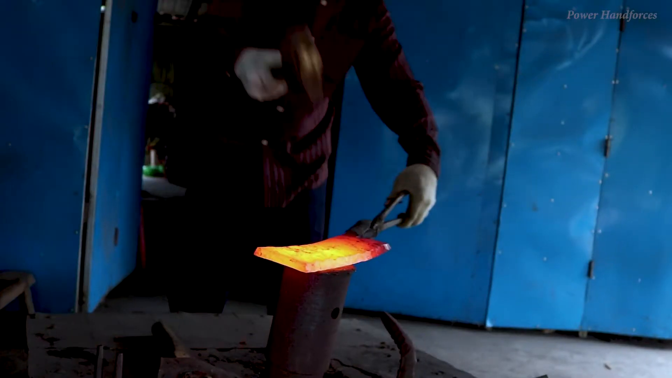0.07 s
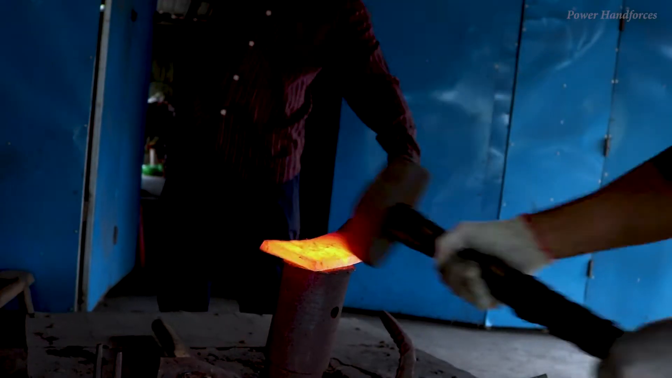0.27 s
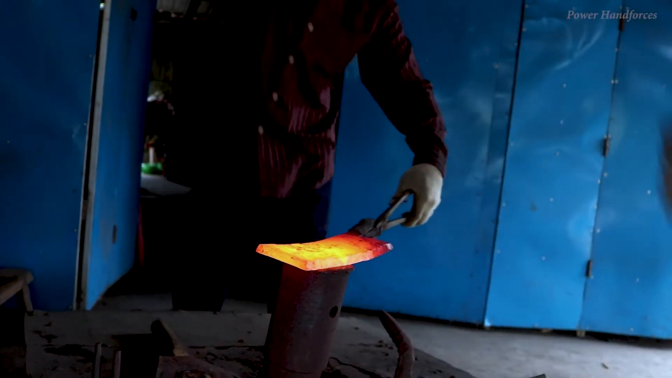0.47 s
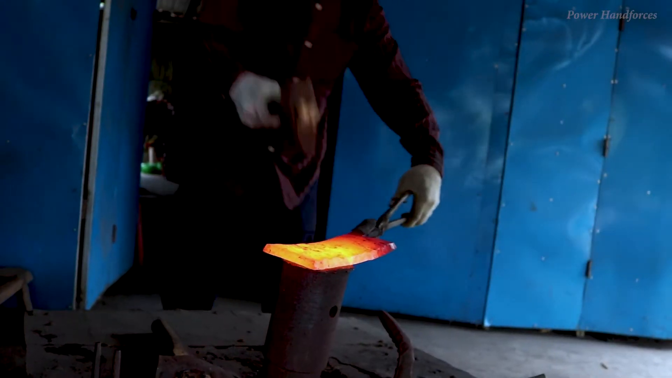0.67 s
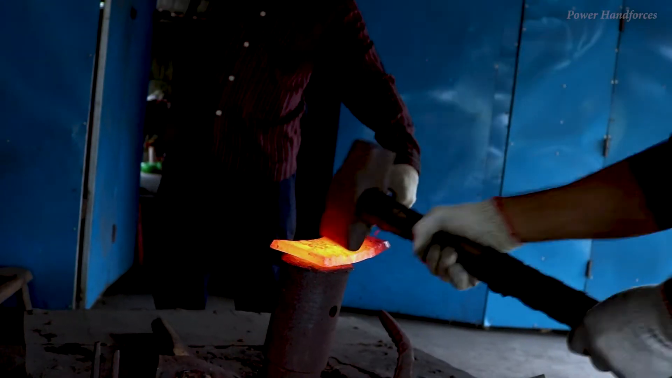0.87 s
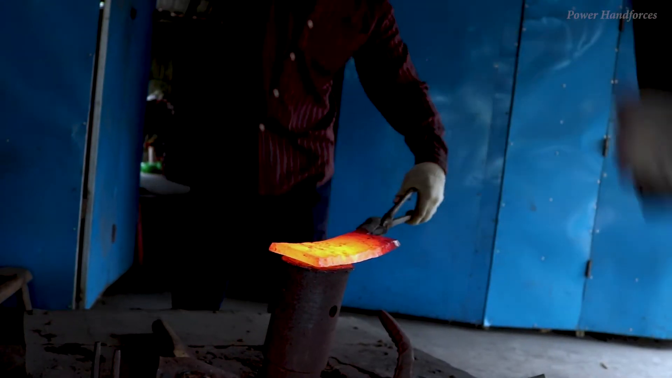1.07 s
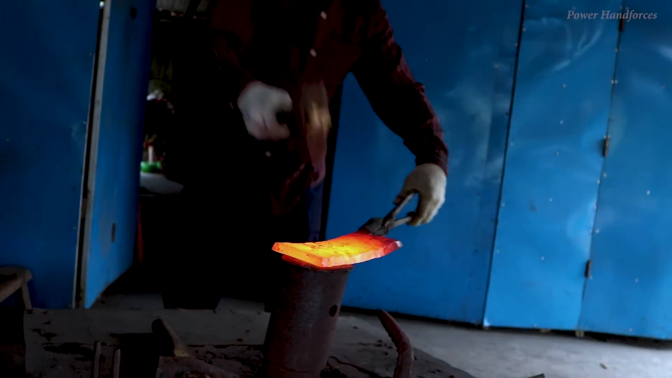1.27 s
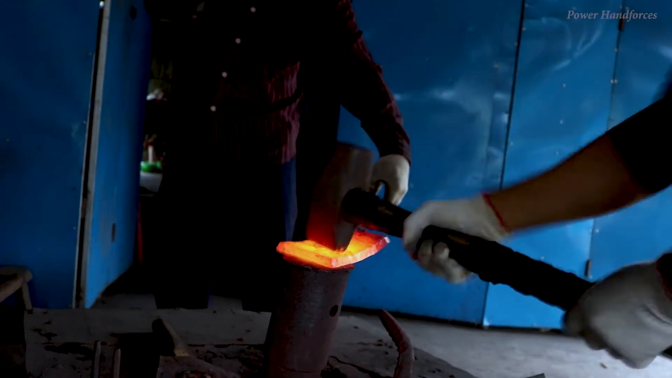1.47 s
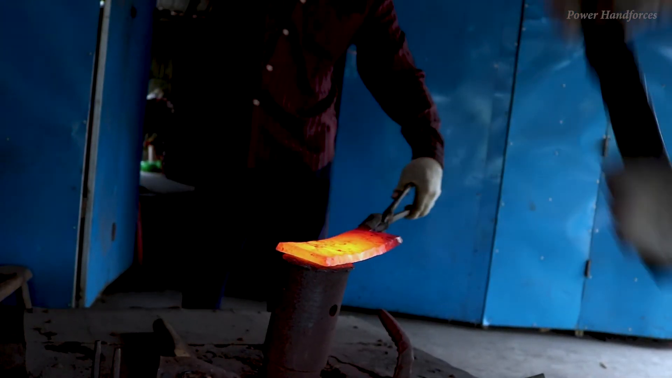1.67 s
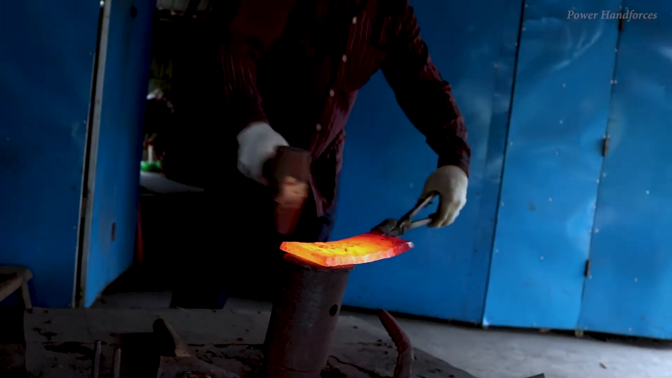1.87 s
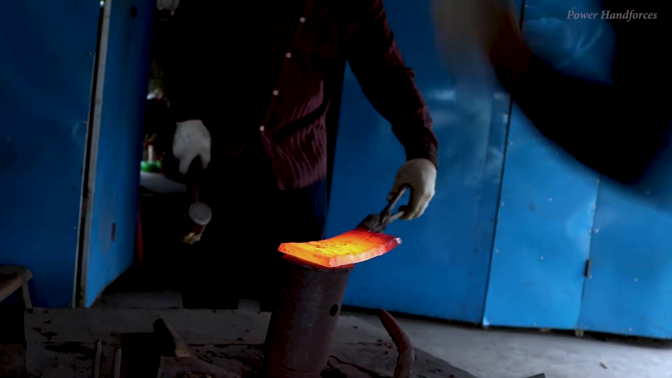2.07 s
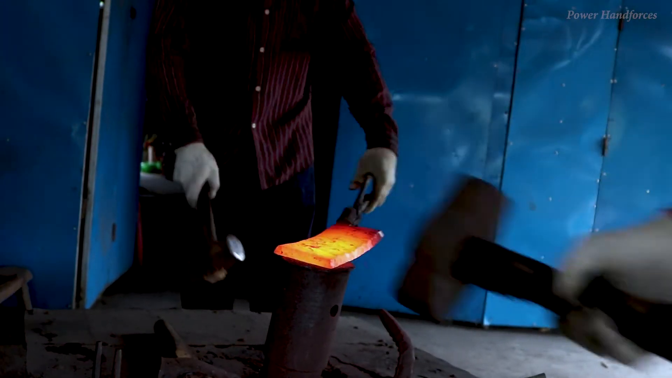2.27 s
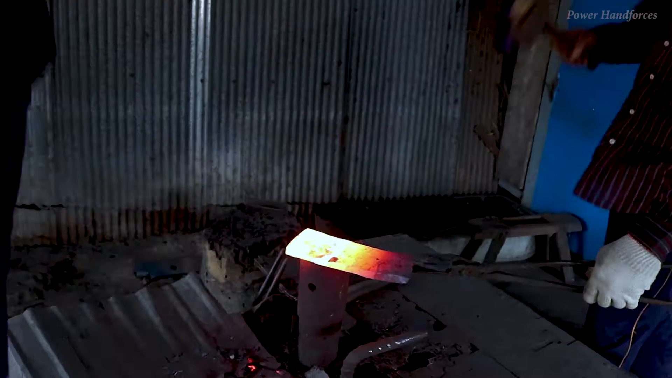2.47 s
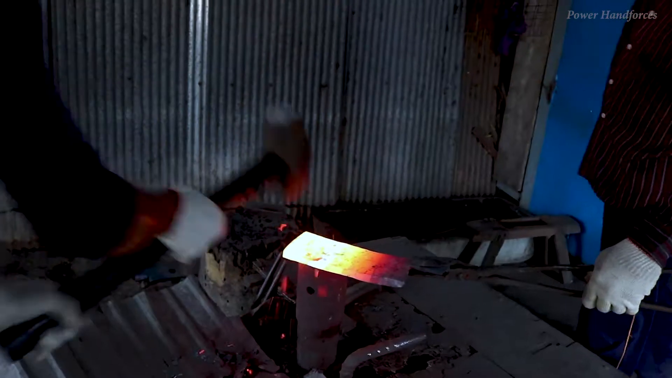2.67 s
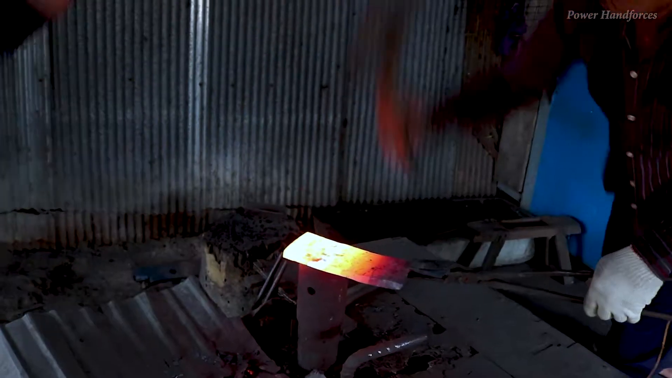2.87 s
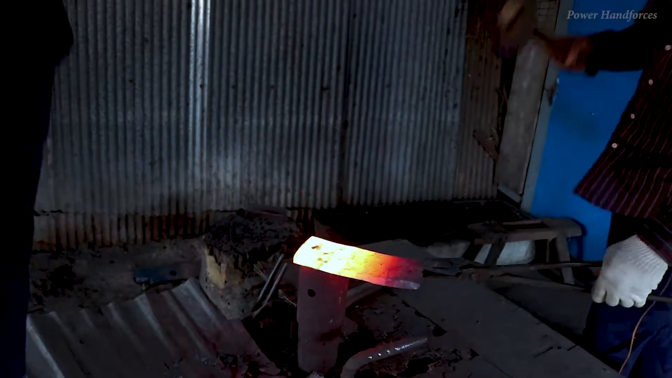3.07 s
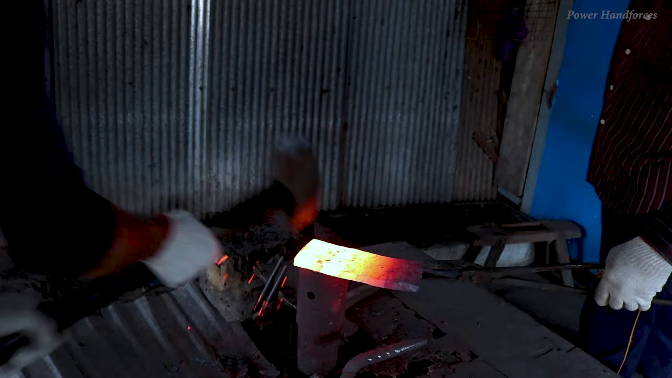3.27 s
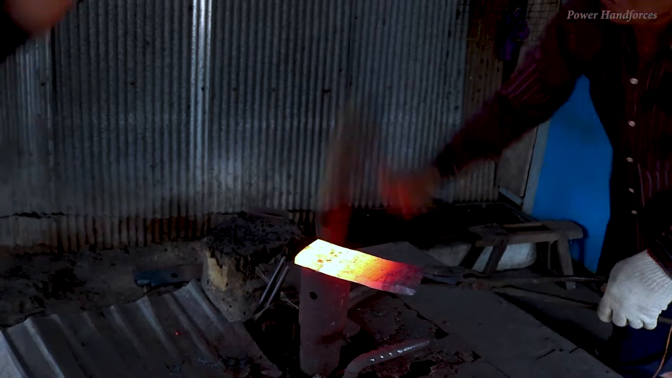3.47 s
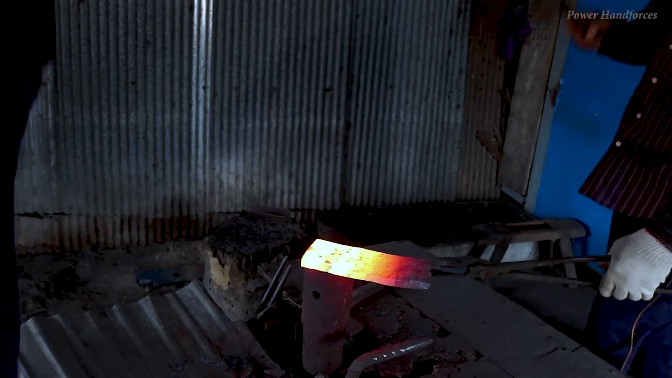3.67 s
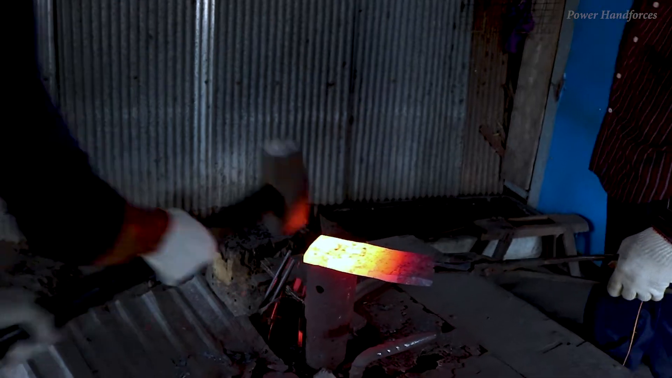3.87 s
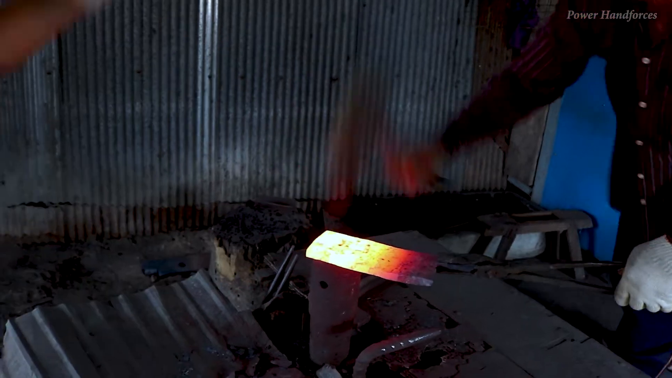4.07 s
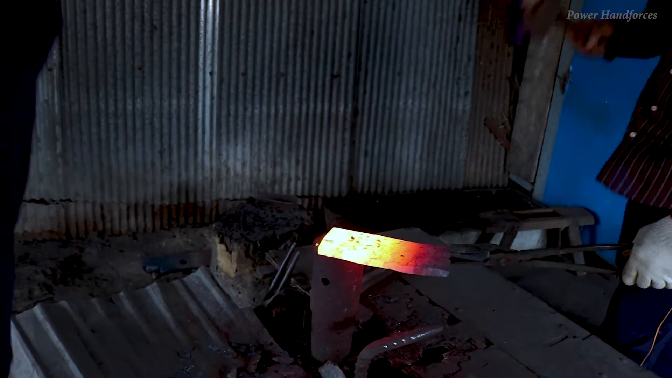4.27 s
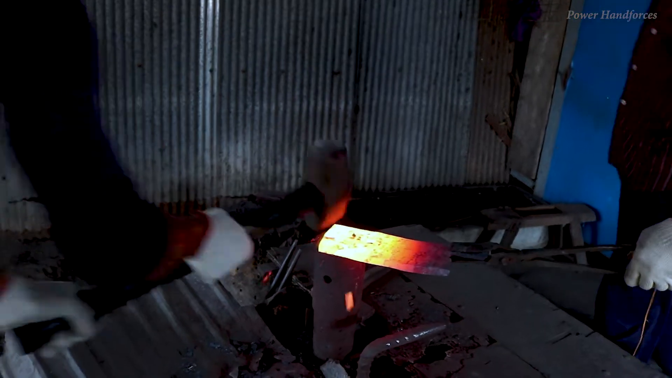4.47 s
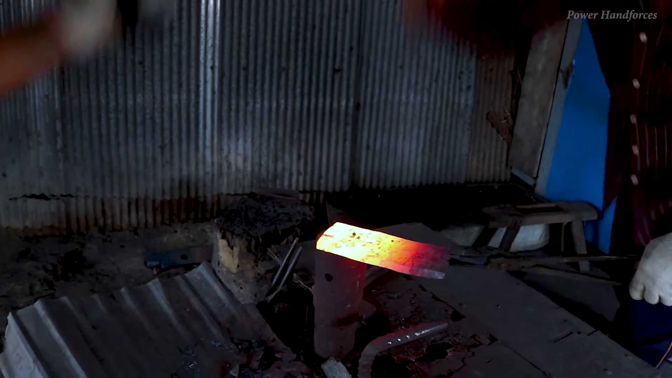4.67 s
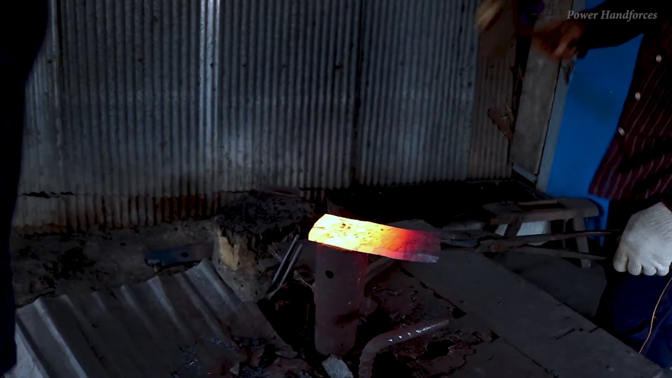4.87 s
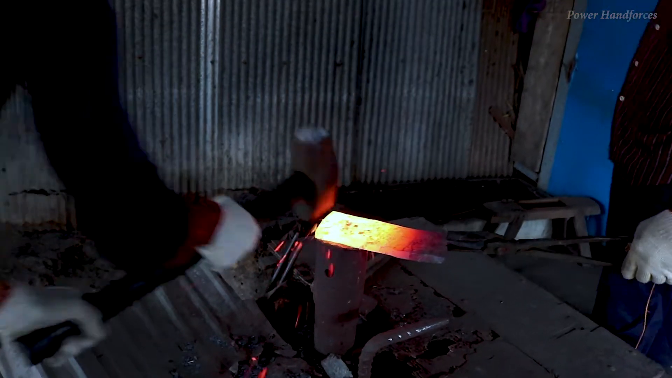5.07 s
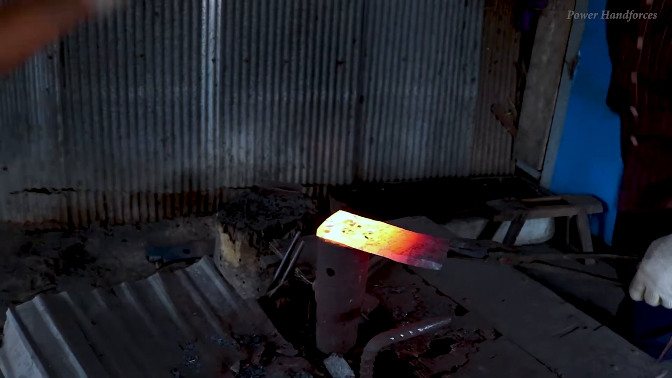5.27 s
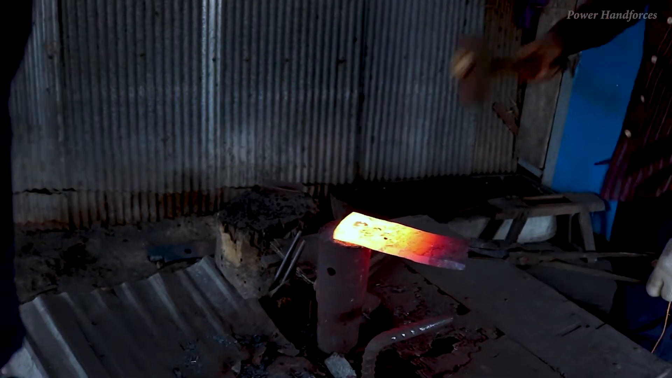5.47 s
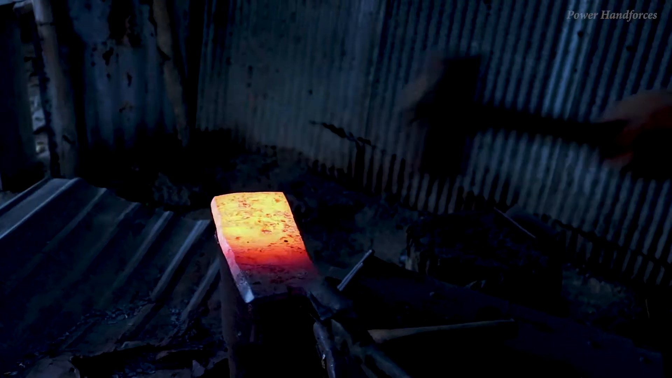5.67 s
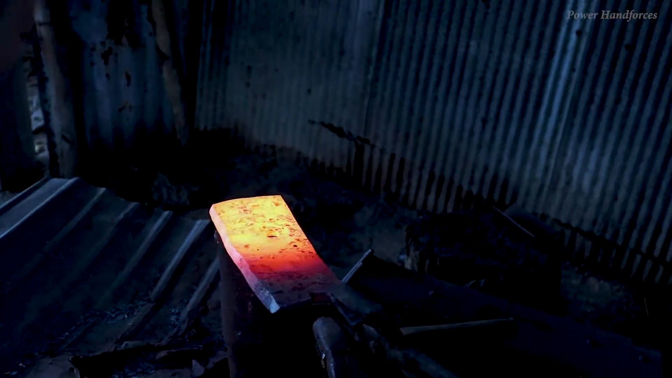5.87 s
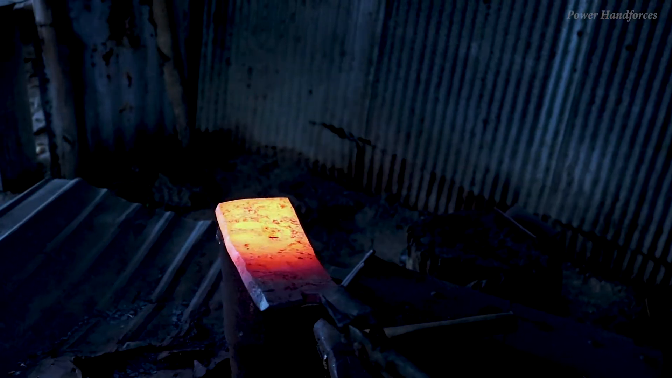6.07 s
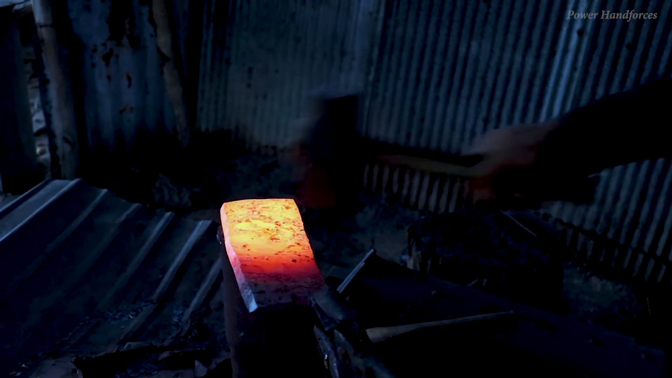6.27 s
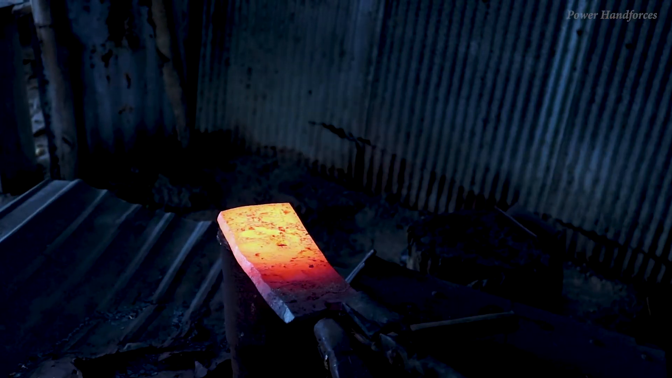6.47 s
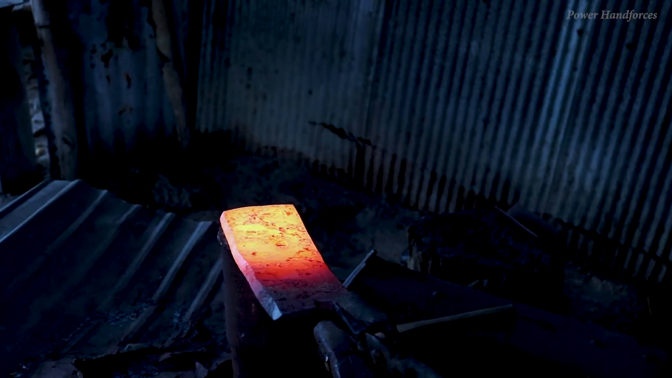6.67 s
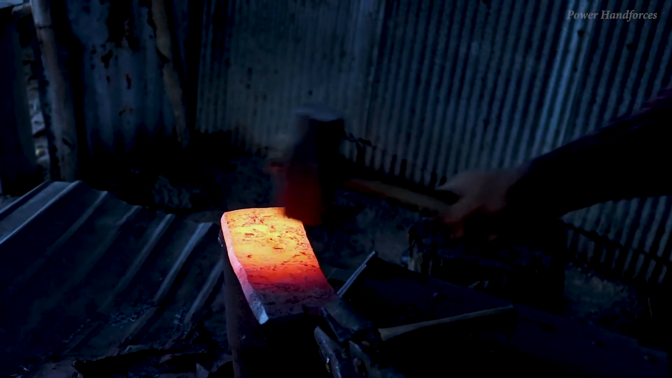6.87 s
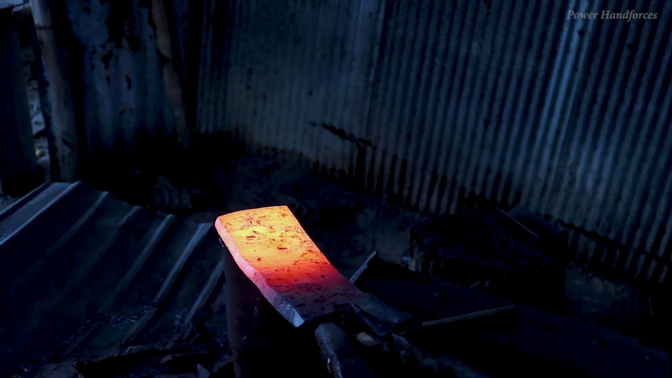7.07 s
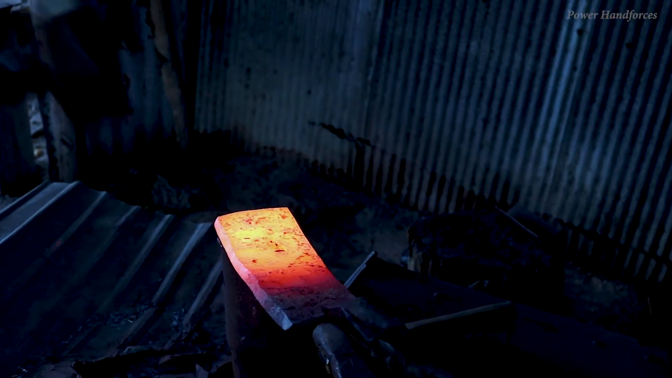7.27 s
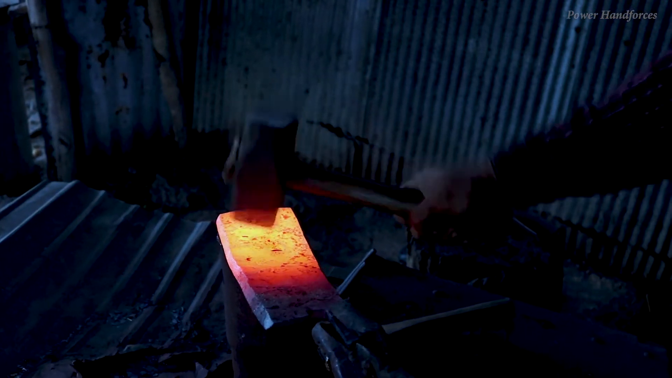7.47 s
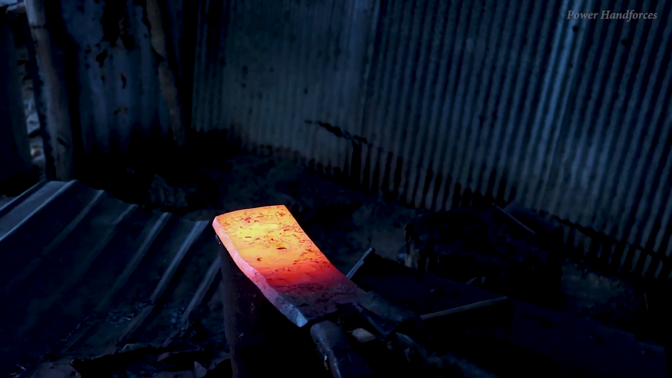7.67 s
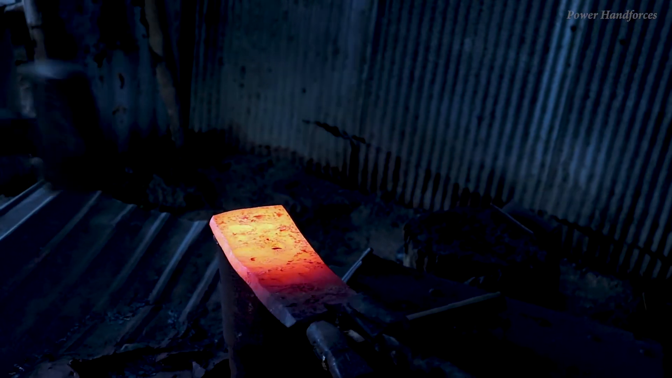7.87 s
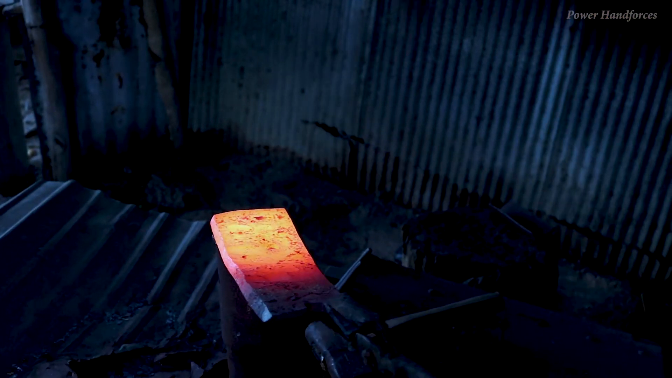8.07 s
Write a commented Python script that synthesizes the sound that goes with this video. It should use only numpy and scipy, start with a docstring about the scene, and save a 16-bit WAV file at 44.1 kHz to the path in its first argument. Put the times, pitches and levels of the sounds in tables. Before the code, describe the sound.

Two hammers, a heavy sledge and a lighter hand hammer, alternate steadily on hot steel over an anvil, loud, clanking and close in a metal shed.

```python
"""Two smiths forge a hot steel blade on a post anvil in a sheet-metal shed: sledge and hand hammer in turn.
Each blow sums dense metal noise, decaying modes of blade, steel and anvil post, and a diffuse shed tail.
Flakes of scale patter down after sledge blows; small knocks and ticks, too, are decaying filtered noise.
A forge fan drones and machines hum behind, as shaped steady noise. The work is heard from three places,
one after the other, so close that the blows overload the input."""
import sys
import numpy as np
from scipy import signal
from scipy.fft import rfft, irfft, next_fast_len
from scipy.io import wavfile
from scipy.ndimage import uniform_filter1d

SR = 44100
rng = np.random.default_rng(int(sys.argv[2]) if len(sys.argv) > 2 else 0)


def store_pcm(level_fs):
    """Save levels as 16-bit WAV."""
    pcm = np.round(np.clip(level_fs, -1, 1) * 32767).astype(np.int16)
    wavfile.write(sys.argv[1], SR, np.atleast_2d(pcm).T)


N = 357651
SIZE = 22050  # samples in one struck sound
T = np.arange(SIZE) / SR

# Likeness of the two channels: frequency_hz, correlation (1 = identical)
LIKENESS = [(100, 0.99), (500, 0.99), (1000, 0.89), (2000, 0.57), (4000, 0.24), (8000, 0.14), (16000, .05)]
# Stereo balance: frequency_hz, left_over_right_db
BALANCE = [(100, 1.5), (500, 2), (1000, 1.8), (2000, 1), (4000, -0.8), (8000, 0), (16000, -0.5)]
LEFT_RIGHT = np.array([[1], [-1]])


def amp(db):
    """Level is logarithmic: converts decibels to amplitude gain."""
    return 10 ** (np.asarray(db) / 20)


def read(points, hz):
    """Interpolates a tabulated response linearly along a log-frequency axis."""
    f, value = np.transpose(points)
    return np.interp(np.log(hz + 1), np.log(f + 1), value)


def evened(x):
    """Normalises mean power: scales a signal to an rms of one."""
    return x / np.sqrt(np.mean(x ** 2) + 1e-20)


def dying(t60):
    """Exponential decay: the level falls 60 dB in t60 seconds."""
    return np.exp(-np.log(1000) * T / np.maximum(t60, 1e-3))


def bell(hz, centre_hz, octaves):
    """A Gaussian resonance hump on the log-frequency axis, its standard deviation in octaves."""
    return np.exp(-.5 * (np.log2((hz + 1) / centre_hz) / octaves) ** 2)


def add(mix, s, sound):
    """Superposition: sums a sound into the mix at a time in seconds, trimmed to fit."""
    at = round(s * SR)
    sound = sound[:, max(-at, 0):]
    part = mix[:, max(at, 0):][:, :sound.shape[1]]
    part += sound[:, :part.shape[1]]


def pair(size):
    """Spatial coherence of a diffuse field: spectra of two noises, alike in the bass, unrelated in the treble."""
    hz = np.fft.rfftfreq(size, 1 / SR)
    mid, side = rfft(rng.standard_normal((2, size)))
    alike = np.clip(read(LIKENESS, hz), -1, 1)
    z = mid * np.sqrt((1 + alike) / 2) + LEFT_RIGHT * side * np.sqrt((1 - alike) / 2)
    return hz, z * amp(LEFT_RIGHT * read(BALANCE, hz) / 2)


def ring(hz, db, t60, detune):
    """Modal superposition: decaying sines of alternating polarity, each shifted by a random fraction."""
    hz = hz * (1 + detune * rng.standard_normal(len(hz)))
    # the phase angle between the channels follows from their likeness
    apart = np.arccos(np.clip(read(LIKENESS, hz), -1, 1)) * rng.choice([-1, 1], len(hz))
    start = np.pi * np.arange(len(hz))
    phase = (start + LEFT_RIGHT * apart / 2)[..., None] + 2 * np.pi * hz[:, None] * T
    gain = amp(db + LEFT_RIGHT * read(BALANCE, hz) / 2)[..., None]
    return (gain * np.sin(phase) * dying(t60[:, None])).sum(1)


def drone(spectrum, drift, rumble_db, hiss_db):
    """Broadband noise of the fan and the yard: rumble and hiss of shaped noise, each drifting slowly in level."""
    size = next_fast_len(N)
    hz, z = pair(size)
    z = z * amp(read(spectrum, hz))
    under = 1 / (1 + (hz / 700) ** 4)  # crossover at 700 Hz
    rumble = evened(irfft(z * under, size)[:, :N])
    hiss = evened(irfft(z * (1 - under), size)[:, :N])
    s, low_db, high_db = np.transpose(drift)
    t = np.arange(N) / SR
    low_gain = amp(rumble_db + np.interp(t, s, low_db))
    high_gain = amp(hiss_db + np.interp(t, s, high_db))
    return rumble * low_gain + hiss * high_gain


def whirs(since, until):
    """Narrow-band noise wavers in level: resonance curves turn noise into the hums of machines near one place."""
    # Hums and whirs of machines: start_s, end_s, centre_hz, width_hz (at half amplitude), level_db
    machine_hums = [(2.3, 4.2, 525, 80, -47), (4.3, 5.7, 280, 10, -55), (4.6, 5.7, 228, 14, -53),
                    (4.6, 5.7, 182, 8, -55), (6.8, 8.3, 286, 8, -59), (7.0, 8.3, 240, 10, -58),
                    (6.6, 8.5, 2120, 280, -58), (6.7, 8.5, 1370, 260, -57.5), (1.9, 2.2, 3100, 800, -56)]
    out = np.zeros((2, N))
    for start, end, centre_hz, width_hz, db in machine_hums:
        if since < (start + end) / 2 < until:
            hz, z = pair(size=131072)
            resonance = 1 / (1 + (2 * (hz - centre_hz) / width_hz) ** 2)
            band = evened(irfft(z * resonance))[:, :round((end - start) * SR)]
            add(out, start, amp(db) * band * signal.windows.tukey(band.shape[1], .5))
    return out


def knock(db, centre_hz, octaves, t60, rattle_db=0.5):
    """A damped impact: a decaying noise band whose level is modulated at random into an uneven rattle."""
    hz, z = pair(SIZE)
    rattle = evened(uniform_filter1d(rng.standard_normal(SIZE), size=130))
    rattle = np.clip(rattle, -2, 2)
    band = irfft(z * bell(hz, centre_hz, octaves), SIZE)
    return amp(db) * evened(band * amp(rattle_db * rattle)) * dying(t60)


def add_small_knocks(mix):
    """Small damped impacts: each knock or tick is one decaying band of noise."""
    # Small knocks and ticks (tongs, the blade shifting on the anvil, stray flakes of scale):
    # start_s, level_db, centre_hz
    small_knocks = [(.4954, -35, 650), (1.001, -31, 693), (1.1043, -51, 4970), (2.032, -42, 3570),
                    (3.1864, -37, 8000), (5.8823, -47.5, 4050), (7.9867, -41, 3800)]
    for s, db, centre_hz in small_knocks:
        add(mix, s, knock(db, centre_hz, octaves=1.25, t60=.095))


def scale_flakes(s, db, fall_s):
    """A random impact process: scale knocked off by the sledge lands in a shower with single ticks among it."""
    centre_hz, octaves = 6400, 1.0
    rise_s, shower_t60 = 0.0098, 0.39  # the scale starts to land, then trickles out
    per_s, straggle_s = 60, .08  # initial rate of ticks, and the time over which they thin out
    shower = knock(db, centre_hz, octaves, shower_t60, rattle_db=4.) * (1 - np.exp(-T / rise_s))
    landing = np.exp(-(T / straggle_s) ** 2 / 2)
    lands = rng.random(SIZE) < landing * per_s / SR
    sizes = amp(3.5 * np.minimum(rng.exponential(1, SIZE), 3)) * lands
    flake = knock(db - 6, centre_hz, octaves, 0.038)
    ticks = signal.fftconvolve(sizes[None], flake, axes=1)[:, :SIZE]
    return s + fall_s, shower + ticks


def crash(hz, z, spot, length):
    """High modal density acts as noise: a crack, a short plateau and a fast fall, then the shed's reverberation."""
    # Reverberation of the shed, before the hammer's factor: frequency_hz, t60_s
    shed_decay = [(60, 0.089), (200, 0.7), (500, 0.28), (1000, .26), (4000, 0.16), (9000, 0.2),
                  (16000, 0.2)]
    hold_s, near_t60, crack_t60, shed_db = 0.0032, 0.084 * length, 0.0051, -11.0
    # capped at one, the decay stays level for the hold time
    near = np.minimum(dying(near_t60) / np.exp(-np.log(1000) * hold_s / near_t60), 1)
    out = irfft(z * spot, SIZE) * (near + dying(crack_t60))  # coloured by the struck spot
    centres = np.geomspace(60, 16000, num=7)
    for centre, share in zip(centres, np.eye(len(centres))):
        # a quarter turn of phase lets the tail add in power; each band dies at its own speed
        band_gain = np.interp(np.log(hz + 1), np.log(centres), share)
        band = irfft(1j * z * band_gain, SIZE)
        out += band * amp(shed_db) * dying(read(shed_decay, centre) * length)
    return out


def overtones(colour):
    """Modal excitation varies with impact: each blow wakes a different handful of the blade's overtones."""
    count = 12
    hz = np.geomspace(1100, 9000, num=count) * 2 ** rng.uniform(-.13, .13, count)
    return ring(hz, -21 + read(colour, hz), np.full(count, 0.1), detune=0)


def blow(hand, force_db, spot_hz, spot_db, ting_db, walls, thud, carry):
    """Impact excites coupled bodies: crash and ring of the blade, ring of the steel, thud of the anvil post."""
    # Crash spectrum of each hammer: frequency_hz, level_db (per Hz)
    sledge_colour = [(40, -17), (100, -12.5), (270, -11.5), (350, -3.5), (750, -1.5), (1000, -2.5),
                     (1800, 0.5), (2700, 0.5), (3900, 6), (4800, -0.5), (6800, -3.5), (9000, -6.5),
                     (13000, -8), (16000, -12)]
    hand_colour = [(40, -26.5), (100, -15.5), (270, -15.5), (350, -6.5), (750, -5), (1400, -4.5),
                   (2300, 0.5), (2900, 0), (4000, 3), (4700, -2), (6000, -0.5), (7500, -6), (12000, -7),
                   (16000, -13)]
    # Ring of hammer head and anvil: frequency_hz, level_sledge_db, level_hand_db, t60_s
    steel_modes = [(1692, -11.5, -28.5, 0.078), (1926, -16.5, -28.5, 0.14), (2200, -18.5, -24.5, 0.13),
                   (2490, -26, -20, .17), (3293, -11, -16, 0.11), (4160, -20, -20.5, 0.078),
                   (3780, -20, -18.5, 0.074), (4076, -11.5, -14.5, 0.11), (5160, -21.5, -26, 0.18),
                   (5980, -24.5, -28, 0.17)]
    # A thin high ring, before each blow's own level: frequency_hz, level_db, t60_s
    ting_modes = [(11522, -19, .15), (11590, -22, .14)]
    clang_hz, repeat = 3700, 0.69  # repeat: share of echo power common to all blows at a place
    blade_db, blade_t60 = -12.5, 0.062
    colour = [sledge_colour, hand_colour][hand]
    length = [0.95, 0.9][hand]  # factor on decay times: the lighter hammer's crash dies sooner
    thud_db, clang_db, fizz_db = carry

    hz, fresh = pair(SIZE)
    # the walls return much the same echoes at every blow
    z = np.sqrt(repeat) * walls + np.sqrt(1 - repeat) * fresh
    colour_db = read(colour, hz)
    colour_db = colour_db + clang_db * bell(hz, clang_hz, .35) + fizz_db * bell(hz, 15000, 0.43)
    # hot steel is well damped, so its resonance is broad
    spot = amp(spot_db * bell(hz, spot_hz, 0.11))
    sound = amp(4.5) * crash(hz, z * amp(colour_db), spot, length)

    steel, post, ting = np.transpose(steel_modes), np.transpose(thud), np.transpose(ting_modes)
    sound += ring(*np.transpose([(spot_hz, blade_db + spot_db, blade_t60)]), detune=0)
    steel_db = steel[1 + hand] + clang_db * bell(steel[0], clang_hz, 0.43)
    sound += ring(steel[0], steel_db, steel[3], detune=0.0031)
    sound += ring(post[0], post[1 + hand] + 1.5 + thud_db, post[3], detune=.004)
    sound += ring(ting[0], ting[1] + ting_db, ting[2], detune=0.001)
    sound += overtones(colour)
    contact = 1 - np.exp(-T / .0002)  # soft onset, time constant 0.2 ms
    return amp(force_db) * sound * contact


def scene():
    """Superposition at three places: each has its own thud, echoes and drone, and fades quickly into the next."""
    # Time at each place: start_s, end_s
    places = [(-.1, 2.456), (2.47, 5.62), (5.626, 8.2)]
    # Thud of anvil post and floor, one list per place: frequency_hz, level_sledge_db, level_hand_db, t60_s
    thuds = [
        [(172, -31, -33, .2), (330.6, -21, -25.5, .16), (383, -14, -23.5, 0.056), (533, -14.5, -25, 0.057),
         (636, -19.5, -17, 0.12), (689, -7.5, -13, 0.079), (760, -6, -14, 0.086), (1010, -17.5, -31, 0.092),
         (1214, -13, -23.5, .11)],
        [(97, -35.5, -41.5, 0.27), (221, -20.5, -26, 0.14), (357, -19, -22.5, 0.086), (465.5, -15, -7.5, 0.062),
         (516, -9.5, -6, 0.051), (567.5, -9, -5.5, 0.056), (661.4, -14, -13, 0.064), (842, -4.5, -9.5, 0.052)],
        [(97.6, -38, -40, 0.19), (318.4, -22, -23, .15), (461, -19, -13.5, 0.054), (623.7, -8.5, -7.5, 0.064),
         (680, -9.5, -13, 0.072), (701, -19, -24, 0.097), (765.7, -4.5, -7.5, 0.066), (950, -19.5, -29, 0.14)],
    ]
    # How sounds carry to each place: thud_db, clang_db (near 3.7 kHz), fizz_db (over 8 kHz), rumble_db, hiss_db
    carries = [(-0.8, 0.25, 5, -1, 0), (-2, -1.5, 2, 1, 0), (-0.7, -0.8, 4, -0.5, 1)]
    # Spectrum of fan and yard, one list per place: frequency_hz, level_db (per Hz, before normalising)
    drone_spectra = [
        [(24, -72), (40, -38), (114, -7.5), (154, -1), (224, -5), (686, -12), (859, -22), (3300, -20),
         (3840, -22.5), (15500, -31.5)],
        [(24, -66.5), (40, -24.5), (106, -15), (174, -1.5), (273, -5.5), (301, -6.5), (387, -4.5), (461, -10),
         (522, -4), (859, -7), (2160, -7), (4350, -11.5), (15500, -25)],
        [(24, -46), (40, -14), (82, -4.5), (154, -10.5), (253, -0.5), (621, -7), (722, -11.5), (1350, -13.5),
         (2990, -15), (3560, -17), (5050, -16.5), (9650, -25), (15500, -25)],
    ]
    # Drift of the drone, one list per place, before the carry: time_s, level_below_700_hz_db, level_above_db
    drone_drifts = [
        [(0.1, -56.5, -57), (1.5, -56, -59.5), (1.64, -59, -58), (2.3, -55.5, -58)],
        [(2.72, -47.5, -43.5), (3.33, -47.5, -41), (3.91, -52, -49), (5.55, -51, -47)],
        [(5.75, -57.5, -58.5), (6.49, -55.5, -59), (7.56, -56.5, -56), (8.1, -49, -50.5)],
    ]
    # Sledge blows, which knock scale off the blade: start_s, force_db, blade_resonance_hz (at the struck spot),
    # resonance_height_db, thin_ring_db, falling_scale_db, time_in_air_s
    sledge_blows = [ (.2952, -3.5, 3120, 1, -3.5, -54, .14), (.9074, -2.5, 3620, 0.5, -5, -58, 0.13),
                    (1.52, -2.5, 3394, 7.5, -5.5, -46, 0.14), (2.1734, -2, 3310, 7, -6, -38, 0.13),
                    (2.6186, -1.5, 1850, 2, 4, -41, 0.13), (3.223, -2, 1840, 8, -2, -39.5, .08),
                    (3.8306, -1, 1497, 0.5, -1, -29.5, 0.12), (4.454, -2.5, 1740, 9, -8, -35.5, 0.11),
                    (5.062, -0.5, 2166, 3.5, -6.5, -32, .09), (5.9403, -0.5, 4100, 5.5, 4, -57, 0.12),
                    (6.566, -1, 3970, 2, 3, -48, 0.13), (7.2067, 0, 4060, 4.5, 5, -40.5, 0.12),
                    (7.8278, -0.5, 1900, 2.5, -5.5, -46, .15)]
    # Answering hand hammer: start_s, force_db, blade_resonance_hz (at the struck spot),
    # resonance_height_db, thin_ring_db
    hand_blows = [ (-.012, -1, 2280, -2, -3), (0.6152, -3, 2276, 2, -2.5), (1.226, -3, 2210, 0, -2),
                  (1.8641, -2.5, 2195, 2, -2.5), (2.9271, -1, 2630, -3.5, -9),
                  (3.5184, -2, 3900, 0.5, -4.5), (4.1241, -1, 1686, -0.5, -5), (4.7568, 0, 5770, 6, -4),
                  (5.3899, -1, 5810, 7.5, -9.5), (5.601, -1.5, 2350, 12.5, 6.5),
                  (6.245, -1.5, 2500, 4.5, 2.5), (6.8865, -1, 2450, 2.5, 1.5), (7.516, -1, 2414, 4.5, -3.5)]

    t, out = np.arange(N) / SR, np.zeros((2, N))
    for place, thud, carried, spectrum, drift in zip(places, thuds, carries, drone_spectra, drone_drifts):
        start, end = place
        *carry, rumble_db, hiss_db = carried
        here = drone(spectrum, drift, rumble_db, hiss_db) + whirs(start, end)
        walls = pair(SIZE)[1]
        for hand, blows in enumerate([sledge_blows, hand_blows]):
            for s, force_db, spot_hz, spot_db, ting_db, *scale in blows:
                # a place may open on the tail of a blow that has just fallen
                if start < s + .05 < end:
                    add(here, s, blow(hand, force_db, spot_hz, spot_db, ting_db, walls, thud, carry))
                    if not hand:
                        add(here, *scale_flakes(s, *scale))
        fade = np.clip(np.minimum(t - start, end - t) / .008, 0, 1)  # 8 ms in and out
        out += here * fade
    add_small_knocks(out)
    return out


def record(dry):
    """Saturation: the blows overload the input and are flattened; a low-pass then limits the band."""
    ceiling, edge_hz = 1.0, 15900
    flattened = dry / (1 + (dry / ceiling) ** 8) ** (1 / 8)
    low_pass = signal.firwin(401, edge_hz, window=("kaiser", 8), fs=SR)
    return signal.oaconvolve(flattened, low_pass[None], "same")


dry = scene()
out = record(dry)
store_pcm(out)
```